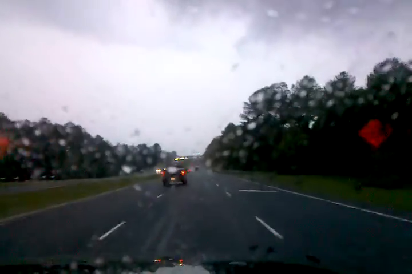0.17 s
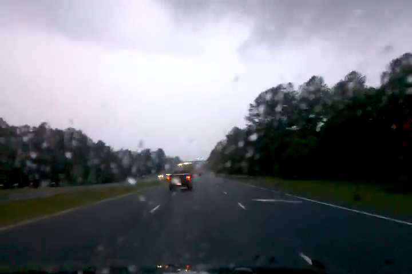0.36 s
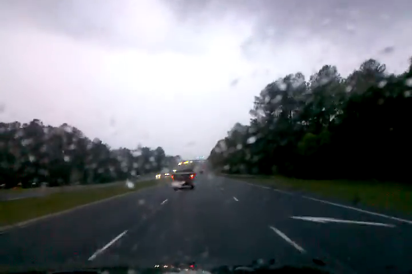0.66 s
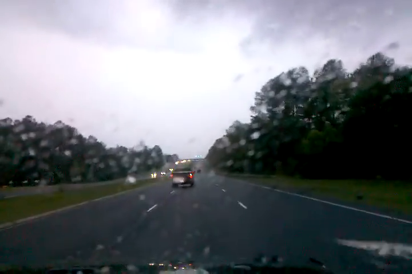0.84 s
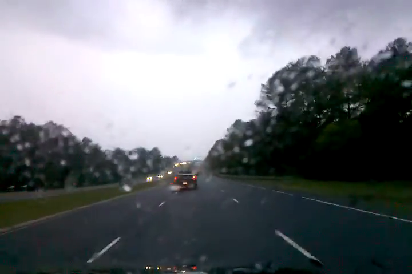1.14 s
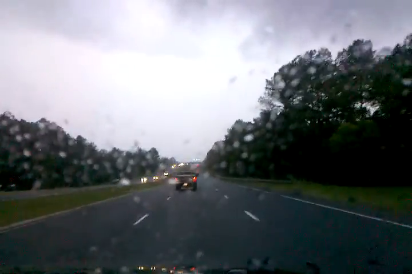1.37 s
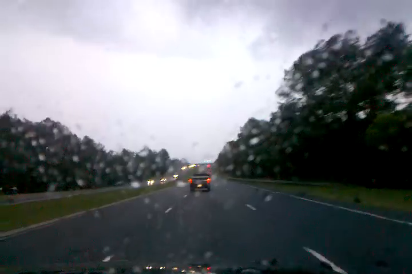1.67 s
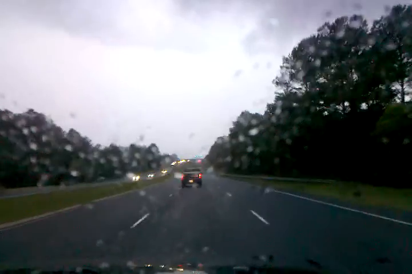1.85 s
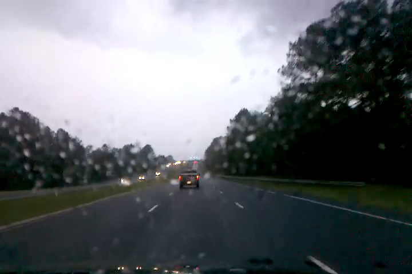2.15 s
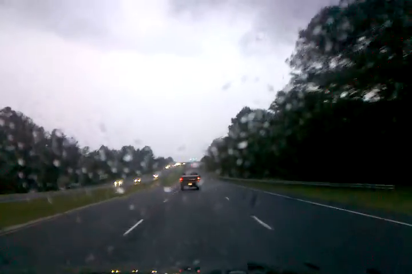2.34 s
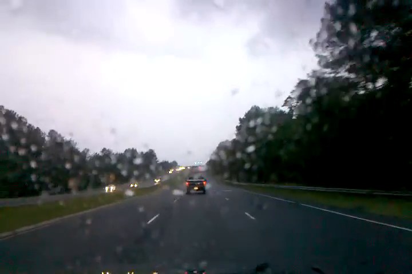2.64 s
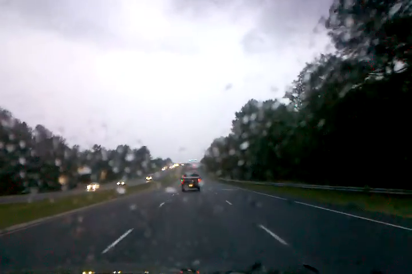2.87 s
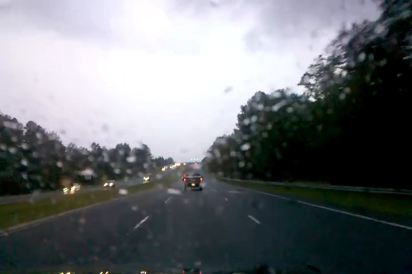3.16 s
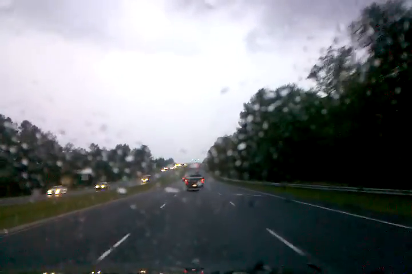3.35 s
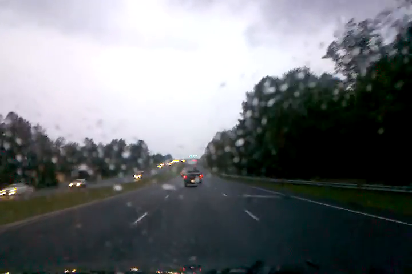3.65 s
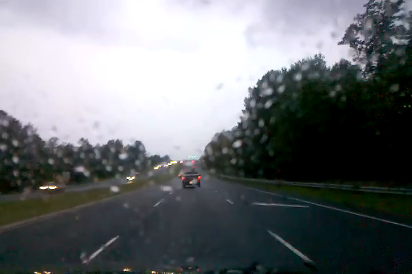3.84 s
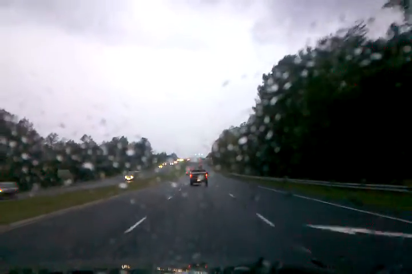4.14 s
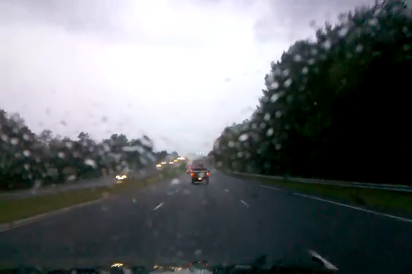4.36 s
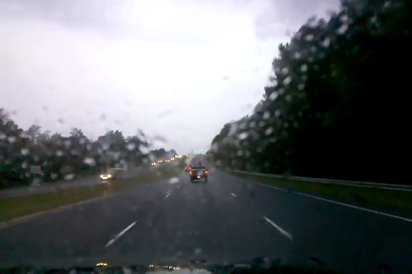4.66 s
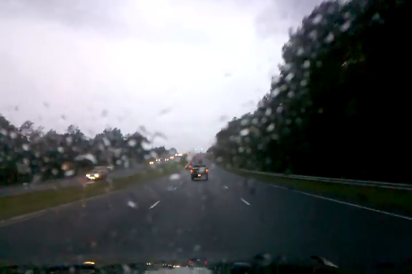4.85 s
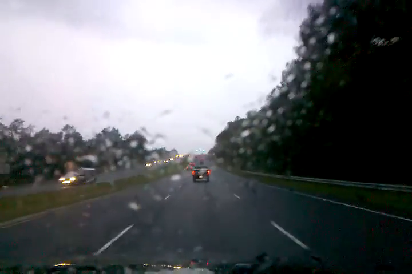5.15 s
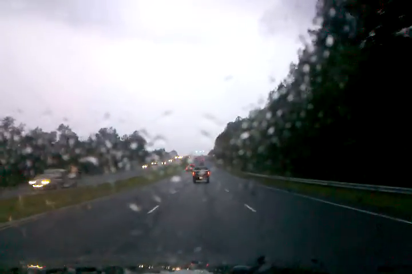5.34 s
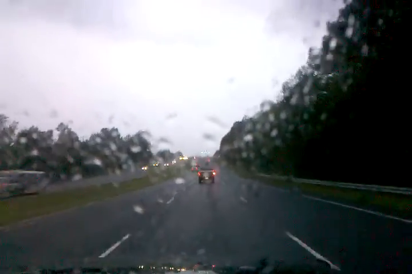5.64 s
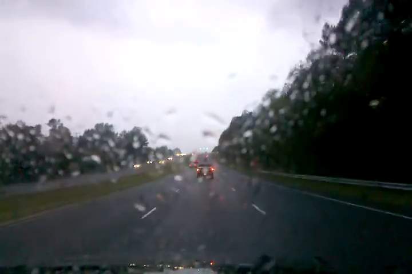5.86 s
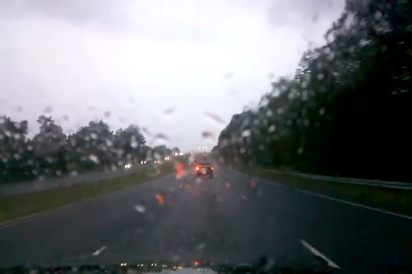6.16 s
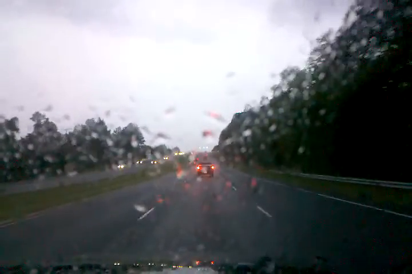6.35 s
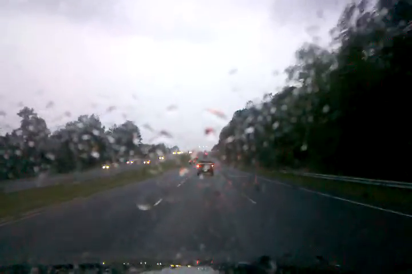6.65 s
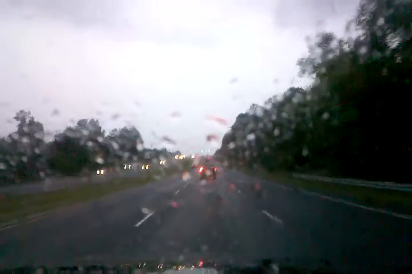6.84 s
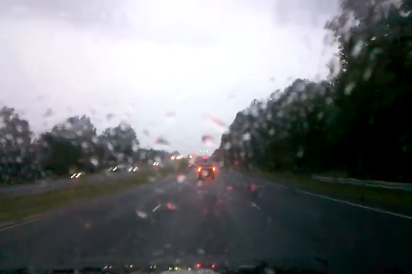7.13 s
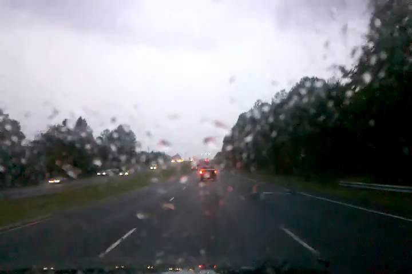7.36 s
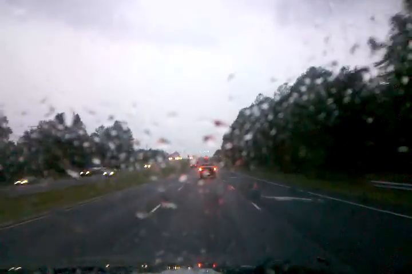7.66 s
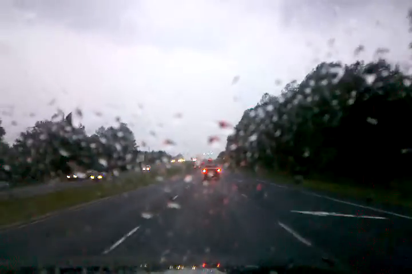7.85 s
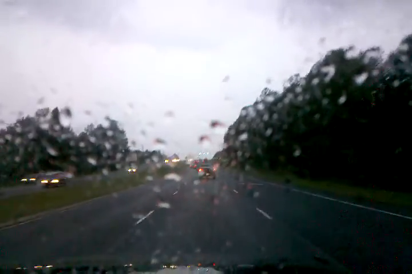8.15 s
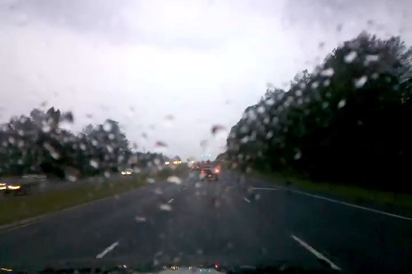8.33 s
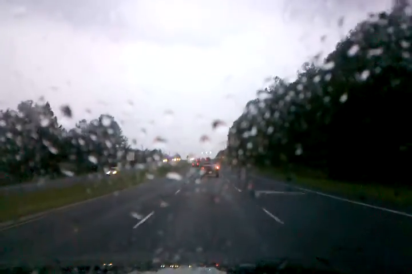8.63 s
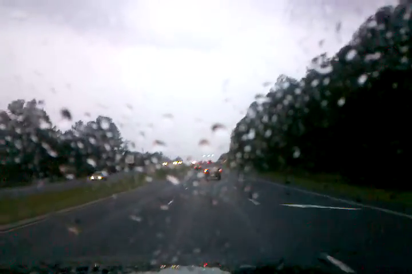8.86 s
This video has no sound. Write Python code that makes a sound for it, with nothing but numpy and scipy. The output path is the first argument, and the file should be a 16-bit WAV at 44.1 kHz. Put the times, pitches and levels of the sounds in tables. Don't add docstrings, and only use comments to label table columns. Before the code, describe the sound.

Inside a car on a wet highway: deep rumbling road boom, steady wet tyre roar, rain pattering and fat drops smacking the windshield.

```python
import sys
import numpy as np
from scipy import signal
from scipy.io import wavfile
from scipy.ndimage import uniform_filter1d

SR = 44100
rng = np.random.default_rng(int(sys.argv[2]) if len(sys.argv) > 2 else 0)


def int16_out(signal):
    q = np.round(np.clip(np.atleast_2d(signal).T, -1, 1) * 32767)
    wavfile.write(sys.argv[1], SR, q.astype(np.int16))


def boost(x):
    u = np.asarray(x, float) / 20
    return 10 ** u


N = 396459

# pitch_hz, density_db (per Hz)
BOOM_SPECTRUM = [(15, -87), (25, -48), (43, -41), (51, -31.5), (83, -10.5), (139, 0.5), (210, -4.5),
                 (269, -6), (309, -18.5), (330, -11), (430, -31.5), (730, -120)]
# pitch_hz, density_db (per Hz)
RUMBLE_SPECTRUM = [(160, -32), (270, -1.5), (311, -8), (355, -1), (594, -7.5), (638, -9), (689, -10.5),
                   (817, -8.5), (1000, -19.5), (1300, -26), (2200, -120)]
# pitch_hz, density_db (per Hz)
ROAR_SPECTRUM = [(530, -31), (900, -3.5), (1010, -3.5), (1230, -1.5), (1440, -5.5), (1590, -2),
                 (1900, -7.5), (2180, -5), (2510, -8.5), (2680, -12), (3300, -21.5), (4290, -36.5),
                 (7260, -120)]
# pitch_hz, density_db (per Hz)
GLASS_SPECTRUM = [(1710, -20), (2900, -6.5), (3490, -6), (3940, -1.5), (4520, -6), (4820, -3.5), (5220, -2),
                  (5700, -4.5), (6740, -1), (7170, -10.5), (7900, -38.5), (10300, -68.5), (17400, -120)]
# pitch_hz, density_db (per Hz)
KNOCK_SPECTRUM = [(400, -17), (700, -2), (1000, 5), (1500, -1), (2500, -14), (3600, -19.5), (5000, -27.5)]
# pitch_hz, width_hz, lift_db
CABIN_RESONANCES = [(205, 20, 6.5), (350, 30, 3), (651, 25, 6), (810, 45, 2.5), (1232, 18, 7),
                    (1597, 50, 3), (1740, 30, 4.5), (2540, 70, 2.5), (5330, 130, 5)]
# pitch_hz, level_db, t60_s
PANE_RINGS = [(3200, -0.5, 0.015), (3960, -18, .015), (5200, -10, 0.016), (6010, -5, 0.011),
              (6750, -3, 0.007)]
# pitch_hz, level_db, t60_s
PANE_FLEXES = [(1730, -3, .012), (2340, 8, 0.01), (2820, -0.5, 0.02)]
# time_s, shaking_db
ROAD_SHAKING = [(0.0, -14), (0.5, -17.5), (0.82, -14), (1.2, -14.5), (1.73, -19), (2.07, -16.5),
                (2.23, -18.5), (2.95, -17), (3.08, -16), (3.33, -18), (3.91, -15.5), (4.11, -18),
                (4.38, -17.5), (4.83, -16), (5.08, -18), (7.06, -19.5), (7.29, -17.5), (8.99, -20)]
# time_s, rain_db
RAINFALL = [(0.0, -37), (0.37, -39.5), (0.82, -37), (1.25, -37.5), (1.55, -40), (2.07, -39), (2.35, -41),
            (2.68, -40), (3.33, -41), (3.83, -37.5), (4.78, -38), (5.13, -40.5), (6.58, -37), (7.84, -40.5),
            (8.99, -40)]
# start_s, length_s, lift_db
SEAMS = [
    (0.016, 0.047, 5),
    (0.195, 0.014, 9.5),
    (0.257, 0.04, 6),
    (1.303, 0.013, 6),
    (1.494, 0.023, 2.5),
    (2.958, 0.062, 3.5),
    (3.085, 0.044, 4.5),
    (3.17, 0.027, 2),
]
# start_s, level_db, pitch_hz, length_s
BODY_THUDS = [(.016, -3, 418, 0.017), (.03, -9, 540, 0.014), (.057, -7.5, 253, .01),
              (.078, -11.5, 296, 0.015), (.163, 6, 195, 0.0053), (.194, -1.5, 244, 0.0094),
              (.266, -5, 422, 0.01), (.28, -6, 346, 0.012), (.841, -4, 164, 0.0099),
              (.89, -10.5, 322, 0.029), (1.016, -5, 203, 0.023), (1.073, -2, 129, 0.035),
              (1.49, -4, 195, 0.021), (1.5, -7, 357, 0.014), (2.967, -8.5, 280, 0.0099),
              (2.99, -13, 423, 0.016), (3.093, -8.5, 312, 0.029), (3.118, -13, 466, 0.011),
              (3.147, -4.5, 238, 0.013), (3.168, -15.5, 404, 0.0081), (3.81, -4.5, 177, 0.017),
              (4.06, -5, 247, 0.01), (4.29, -8.5, 168, .03), (4.6, -9, 190, 0.023), (4.72, -9, 216, 0.022),
              (4.898, -14, 244, 0.049), (5.43, -8.5, 195, 0.029), (7.268, -6.5, 199, 0.02),
              (7.469, -11.5, 201, 0.02), (7.969, -7, 191, 0.021)]
# start_s, level_db, pitch_hz, snap_db (relative to the ring)
ROOF_KNOCKS = [(0.037, -5.5, 890, -28), (0.204, -6, 734, -17), (0.265, -11.5, 750, -20),
               (0.28, -5.5, 893, -19), (1.087, -8.5, 812, -15), (1.314, -4.5, 934, -21),
               (1.339, -12, 902, -15), (1.498, -7.5, 990, -31), (1.502, -14, 772, -25.5),
               (3.096, -14, 910, -25), (3.121, -22, 775, -21), (3.168, -9, 807, -38),
               (3.806, -18, 850, -32)]
# start_s, level_db, pitch_hz (strongest ring), flex_db (relative)
FAT_DROPS = [(0.5242, -21, 5200, -6), (0.611, -16.5, 5050, -13), (0.7856, -19, 4710, -9),
             (0.852, -15.5, 5300, -2), (1.0061, -24, 3360, -7), (1.477, -21, 3000, -3),
             (1.49, -12.5, 5130, -7), (1.7833, -23, 3950, 4), (1.8427, -19, 5230, -5),
             (1.8673, -15.5, 4970, -7), (2.0018, -18, 5070, -6), (2.5346, -17.5, 5270, -8),
             (2.7711, -20, 5150, -5), (3.8701, -25, 3900, -10), (4.0637, -20.5, 3800, -4),
             (4.6853, -17, 5150, -17), (4.8484, -13.5, 4880, -9), (4.8998, -22, 5030, -8),
             (5.4849, -22, 5250, -9), (5.6535, -18.5, 5130, -3), (6.021, -12.5, 4930, -6),
             (6.144, -20, 5300, -3), (6.2282, -22, 5000, -8), (6.406, -21, 6800, -7),
             (6.4677, -21, 5260, -3), (6.9107, -27, 5810, -7), (7.0763, -22, 6770, -7),
             (7.3198, -23, 3860, -5), (7.7927, -24, 5400, -12), (8.4232, -16.5, 5400, -6)]

ROAD_USUAL_DB, RAIN_USUAL_DB = -18, -39
BOOM_DB, BOOM_FOLLOWS = -19.5, 0.97
RUMBLE_DB, RUMBLE_FOLLOWS = -22.5, 1.06
ROAR_DB, ROAR_FOLLOWS, ROAR_WET = -29, 0.37, 0.37
PATTER_DB, PATTER_FOLLOWS = -39.5, 1.1
LUMPS_DB, LUMP_S, ROAR_LUMPY = 0.8, 0.025, 0.5
JOLT_EDGE_S = 0.0043
JOLT_REACH = 0.38
MIDDLING_COUNT, HEAVIER = 120, 2.5
MIDDLING_DB, MIDDLING_SPREAD_DB = -25.5, 6
FLEX_DB, FLEX_SPREAD_DB = -1, 5.5
MIRROR_HZ = 16000
OVERLOAD = 0.71


def evened(x):
    return x / np.sqrt(np.mean(x ** 2) + 1e-20)


def read(points, hz):
    f, value = np.transpose(points)
    return np.interp(np.log(hz + 1), np.log(f + 1), value, left=-90, right=-90)


def along(rows):
    s, value = np.transpose(rows)
    return np.interp(np.arange(N) / SR, s, value)


def shaking_db():
    return along(ROAD_SHAKING) - ROAD_USUAL_DB


def heaviness_db():
    return along(RAINFALL) - RAIN_USUAL_DB


def lift_db(hz):
    return sum(db / (1 + (2 * (hz - f) / width) ** 2) for f, width, db in CABIN_RESONANCES)


def noise(points, size, patchy_db, flicker_db):
    frames, hz = 4 * N // size + 5, np.fft.rfftfreq(size, 1 / SR)
    real, imaginary, patches = rng.standard_normal((frames, len(hz), 3)).T
    patches = uniform_filter1d(patches, size=10, axis=0)
    patches = evened(uniform_filter1d(patches, size=8, axis=1))
    flicker = evened(uniform_filter1d(rng.standard_normal(frames), size=3))
    tone_db = (read(points, hz) + lift_db(hz))[:, None]
    field_db = tone_db + patchy_db * patches + flicker_db * flicker
    spectra = (real + 1j * imaginary) * boost(field_db)
    return evened(signal.istft(spectra, nperseg=size, noverlap=3 * size // 4)[1][:N])


def colour(points, size=4096):
    hz = abs(np.fft.fftfreq(size, 1 / SR))
    log_gain = np.log(boost(read(points, hz) + lift_db(hz)))
    smooth = uniform_filter1d(log_gain, size=3, mode="wrap")
    return np.fft.ifft(np.exp(smooth - 1j * signal.hilbert(smooth).imag)).real[:size // 2]


def add(mix, s, sound):
    part = mix[max(round(s * SR), 0):][:len(sound)]
    part += sound[:len(part)]


def lumps_db():
    swing = rng.standard_normal(N)
    for _ in range(2):
        swing = evened(uniform_filter1d(swing, size=round(LUMP_S * SR)))
    return LUMPS_DB * swing


def jolts_db():
    t = np.arange(N) / SR
    lift = np.zeros(N)
    for s, length, db in SEAMS:
        to_edge = np.minimum(t - s, s + length - t)
        lift += db * np.clip(to_edge / JOLT_EDGE_S + 0.5, 0, 1)
    return lift


def boom():
    shaking = shaking_db()
    low = noise(BOOM_SPECTRUM, size=2048, patchy_db=0.37, flicker_db=0.2)
    upper = noise(RUMBLE_SPECTRUM, size=1024, patchy_db=0.5, flicker_db=0.3)
    rumble_db = RUMBLE_DB + RUMBLE_FOLLOWS * shaking + jolts_db()
    return boost(BOOM_DB + BOOM_FOLLOWS * shaking) * low + boost(rumble_db) * upper


def tyres():
    level_db = ROAR_DB + ROAR_FOLLOWS * shaking_db() + ROAR_WET * heaviness_db()
    return boost(level_db) * noise(ROAR_SPECTRUM, size=2048, patchy_db=0.6, flicker_db=0.47)


def patter(per_s=2500, spread_db=3.2, hiss_db=1.0, knock_db=-0.5, splat_s=0.0099):
    gust = boost(1.2 * evened(uniform_filter1d(rng.standard_normal(N), size=700)))
    strength = boost(spread_db * np.minimum(rng.exponential(1, N), 5))
    hits = strength * (rng.random(N) < gust * per_s / SR)
    splats = signal.lfilter([1], [1, -boost(-60 / splat_s / SR)], hits) * rng.standard_normal(N)
    ticks = evened(signal.oaconvolve(splats, colour(GLASS_SPECTRUM))[:N])
    drumming = evened(signal.oaconvolve(splats, colour(ROAR_SPECTRUM))[:N])
    hiss = noise(GLASS_SPECTRUM, size=512, patchy_db=1.0, flicker_db=1.7)
    rain = evened(ticks + boost(hiss_db) * hiss) + boost(knock_db) * drumming
    return boost(PATTER_DB + PATTER_FOLLOWS * heaviness_db()) * rain


def thuds():
    out = np.zeros(N)
    for (s, db, hz, length), phase in zip(BODY_THUDS, rng.random((len(BODY_THUDS), 2))):
        t = np.arange(0, 3 * length, 1 / SR)
        swing = np.sin(2 * np.pi * (hz * t * (1 - 1.7 * t) + phase[0]))
        swing = swing + 0.24 * np.sin(2 * np.pi * (2.3 * hz * t + phase[1]))
        envelope = (1 - np.exp(-t / 0.0011)) * np.exp(-(t / length) ** 4)
        add(out, s, boost(db - 4.0) * swing * envelope)
    return signal.sosfilt(signal.butter(2, 70, "high", fs=SR, output="sos"), out)


def knocks():
    out, t = np.zeros(N), np.arange(1800) / SR
    body = colour(KNOCK_SPECTRUM)
    rattle = rng.standard_normal((len(ROOF_KNOCKS), len(t)))
    attack = 1 - np.exp(-t / 0.00099)
    for (s, db, hz, snap_db), puff in zip(ROOF_KNOCKS, rattle):
        ring = boost(-60 * t / 0.017) * np.sin(2 * np.pi * hz * t)
        snap = boost(snap_db + 6.0 - 60 * t / 0.0058) * np.sin(2 * np.pi * 3400 * t)
        shake = boost(-6.5 - 60 * t / 0.038) * evened(np.convolve(puff, body)[:len(t)])
        add(out, s, boost(db + 0.5) * (ring + snap + shake) * attack)
    return out


def middling():
    when, size, across, up, detune, give = rng.random((MIDDLING_COUNT, 6)).T
    fallen = np.cumsum(boost(HEAVIER * heaviness_db()))
    share = (np.arange(MIDDLING_COUNT) + when) / MIDDLING_COUNT
    s = np.interp(share, fallen / fallen[-1], np.arange(N) / SR)
    mode = ((across + up) / 2 * len(PANE_RINGS)).astype(int)
    hz = np.transpose(PANE_RINGS)[0][mode] * (1 + 0.055 * (detune - 0.5))
    level_db = MIDDLING_DB - MIDDLING_SPREAD_DB * size
    flex_db = FLEX_DB + FLEX_SPREAD_DB * (give - 0.5)
    return list(zip(s, level_db, hz, flex_db))


def drops(reach_hz=1600, rise_s=0.00026, splash_db=-9, smack_db=2.0):
    out, t = np.zeros(N), np.arange(1300) / SR
    modes, rows = PANE_RINGS + PANE_FLEXES, FAT_DROPS + middling()
    count = len(PANE_RINGS)
    chance = rng.random((len(rows), len(modes), 2))
    spray = rng.standard_normal((len(rows), len(t)))
    glass, start = colour(GLASS_SPECTRUM), 1 - np.exp(-t / rise_s)
    smack = glass[:len(t)] / abs(glass).max()
    for (s, db, hz, flex_db), draw, puff in zip(rows, chance, spray):
        rings = []
        for (f, mode_db, t60), (detune, phase) in zip(modes, draw):
            turns = f * (1 + 0.023 * (detune - 0.5)) * t + phase
            rings.append(boost(mode_db - 60 * t / t60) * np.sin(2 * np.pi * turns))
        near = [boost(-4 * ((f - hz) / reach_hz) ** 2) for f, _, _ in PANE_RINGS]
        own_ring = 1.4 * boost(-60 * t / 0.011) * np.sin(2 * np.pi * hz * t)
        splash = evened(np.convolve(puff, glass)[:len(t)]) * boost(splash_db - 60 * t / 0.035)
        tick = start * (own_ring + np.dot(near, rings[:count]) + splash)
        tick = tick + boost(smack_db) * smack
        flex = start * sum(rings[count:])
        drop = tick / abs(tick).max() + boost(flex_db) * flex / abs(flex).max()
        add(out, s, boost(db + 0.44) * drop)
    return out


def scene():
    edge = signal.firwin(61, 7300, window=("kaiser", 6), fs=SR)
    smacks = drops()
    dulled = signal.oaconvolve(0.72 * smacks + knocks() + thuds(), edge, "same")
    hits = dulled + 0.28 * smacks
    body, tread, rain, uneven_db = boom(), tyres(), patter(), lumps_db()
    tread_db = ROAR_LUMPY * uneven_db + JOLT_REACH * jolts_db()
    return (boost(uneven_db) * body + boost(tread_db) * tread + rain + hits)[None]


def roll_off(x):
    return signal.sosfilt(signal.butter(12, 15830, fs=SR, output="sos"), x)


def record(dry):
    mirror = 2 * dry * np.cos(2 * np.pi * MIRROR_HZ * np.arange(N) / SR)
    leak = signal.firwin(301, [7950, 9000], pass_zero=False, window=("kaiser", 9), fs=SR)
    heard = dry + boost(-28) * signal.oaconvolve(mirror, leak[None], "same")
    ceiling = signal.firwin(401, 9250, window=("kaiser", 11), fs=SR)
    heard = signal.oaconvolve(heard, ceiling[None], "same")
    bent = heard / (1 + (heard / OVERLOAD) ** 36) ** (1 / 36)
    return roll_off(bent)


dry = scene()
out = record(dry)
int16_out(out)
```